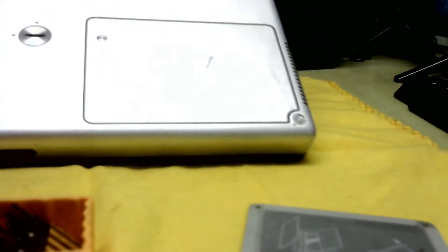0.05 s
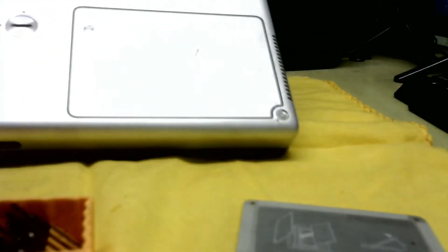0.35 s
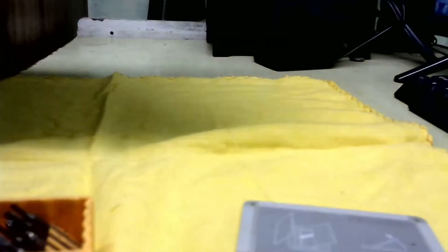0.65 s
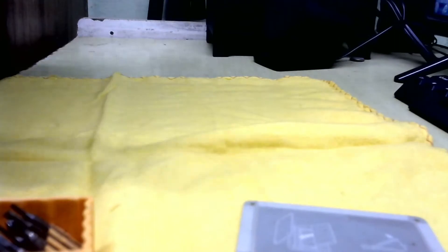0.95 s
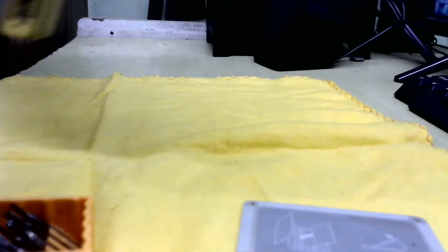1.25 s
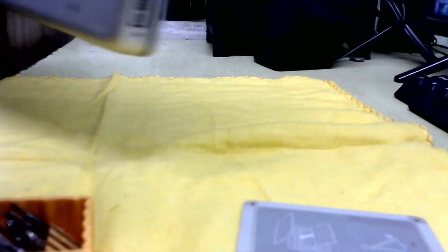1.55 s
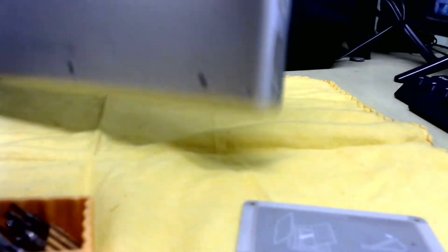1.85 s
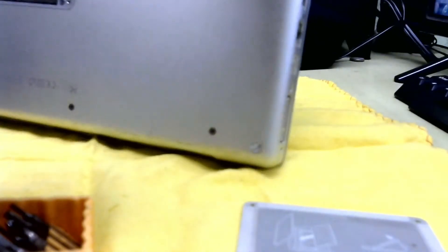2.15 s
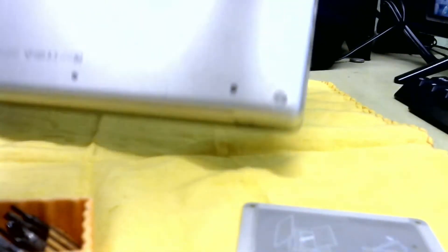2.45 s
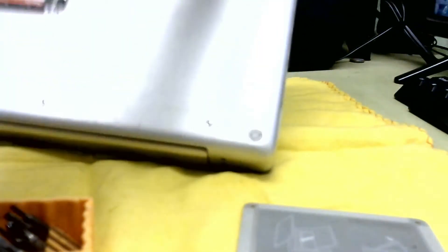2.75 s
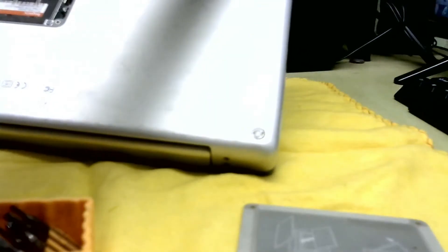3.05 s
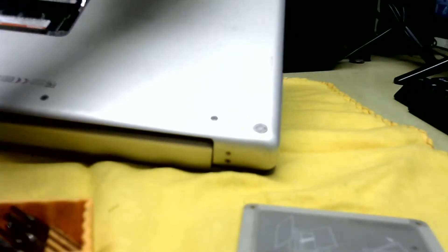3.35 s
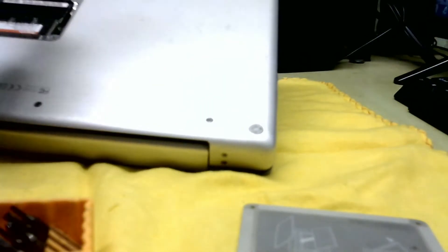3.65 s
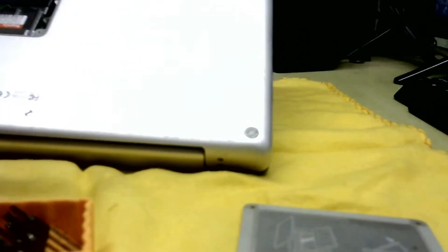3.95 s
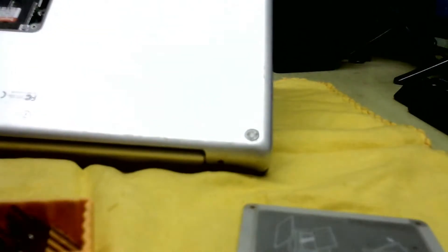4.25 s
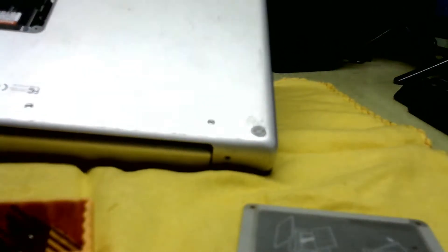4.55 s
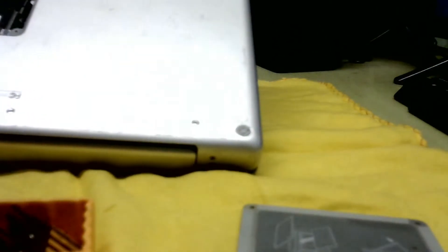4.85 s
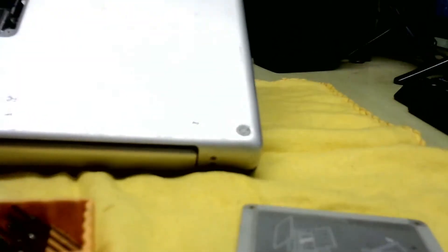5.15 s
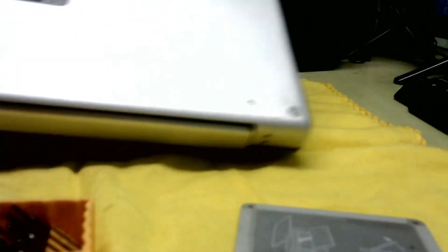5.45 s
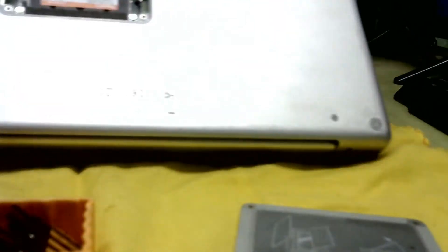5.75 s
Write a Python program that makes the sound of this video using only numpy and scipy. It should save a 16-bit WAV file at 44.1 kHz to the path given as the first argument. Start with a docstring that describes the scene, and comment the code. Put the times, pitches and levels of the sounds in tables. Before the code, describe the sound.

In a small, quiet room with a faint thin whine, hands turn a metal laptop near the microphone. Brief gritty creaks build to a sharp click, followed by light swishes of skin and hollow finger bumps. The laptop lands on a cloth-covered table with two dull knocks and a firmer, clicking thump. Loose parts tick very faintly, and a few gentle clicks, strokes and bumps end the handling.

```python
"""A metal laptop is handled close to a small microphone, in a small, dry room with low noise and a thin whine.
First it is lifted and turned: its shell creaks by stick-slip friction, clicks and squeaks once,
while skin hisses over the metal and fingers bump the hollow case. From two seconds on its edge thumps
a cloth-covered table, exciting their joint modes. Loose parts tick faintly while it stands on edge;
last come softer thumps, clicks and strokes as it is laid down."""
import sys
import numpy as np
from scipy import signal
from scipy.fft import rfft, irfft
from scipy.io import wavfile
from scipy.ndimage import uniform_filter1d

SR = 44100
rng = np.random.default_rng(int(sys.argv[2]) if len(sys.argv) > 2 else 0)


def int16_out(signal):
    """Quantize to a 16-bit WAV file."""
    q = np.round(np.clip(np.atleast_2d(signal).T, -1, 1) * 32767)
    wavfile.write(sys.argv[1], SR, q.astype(np.int16))


N = 264864
T = np.arange(N) / SR
AGE = T[:SR // 2]  # seconds since the onset of one event

# The spectrum of a click. Each row: frequency in Hz, level in dB.
CLICK_SPECTRUM = [(100, -38), (400, -2.5), (750, 15), (3100, -4.5), (4100, -8), (5400, -5.5), (9200, -8),
                  (10800, -18.5), (16000, -25.5)]


def undb(db):
    """Amplitude grows tenfold for every 20 dB."""
    return 10 ** (np.asarray(db) / 20)


def unit(x):
    """Normalisation to an rms of 1."""
    return x / np.sqrt(np.mean(x ** 2))


def crest(x, size):
    """Short-time normalisation: the loudest stretch of size samples gets an rms of 1."""
    return x / np.sqrt(uniform_filter1d(x ** 2, size, mode="constant").max())


def add(track, s, sound):
    """Superposition: a sound adds to the track from s seconds on."""
    start = max(int(s * SR), 0)
    track[start:start + len(sound)] += sound[:max(N - start, 0)]


def through(x, response):
    """A linear system convolves its input with its impulse response; the length is kept."""
    return signal.fftconvolve(x, response)[:len(x)]


def colour(x, points, size=4096):
    """Minimum-phase filtering by a curve of (Hz, dB) points."""
    hz, db = np.transpose(points)
    bins = np.maximum(np.arange(size // 2 + 1) * SR / size, 1)
    gain = undb(np.interp(np.log(bins), np.log(hz), db))
    cepstrum = irfft(np.log(gain))
    cepstrum[1:size // 2] *= 2  # folding the cepstrum makes the filter causal
    cepstrum[size // 2 + 1:] = 0
    return through(x, irfft(np.exp(rfft(cepstrum))))


def band(x, hz, octaves):
    """Band-pass filtering around hz."""
    edges = np.minimum(hz * 2 ** (np.array([-.5, .5]) * octaves), [SR / 3, SR / 2 - 1])
    return signal.sosfilt(signal.butter(2, edges, "band", fs=SR, output="sos"), x)


def fade(t60):
    """Exponential decay, by 60 dB in t60 seconds."""
    return np.exp(-np.log(1000) * AGE / t60)


def ring(modes):
    """Modal superposition: damped sines add, with neighbours in opposite phase."""
    return sum((-1) ** k * undb(db) * fade(t60) * np.sin(2 * np.pi * hz * AGE)
               for k, (hz, db, t60) in enumerate(modes))


def gripped(modes, spread_db, detune):
    """Boundary conditions: each spot and grip shifts the frequencies and weights of the modes."""
    chance = rng.standard_normal((len(modes), 2))
    return [(hz * (1 + detune * a), db + spread_db * b, t60)
            for (hz, db, t60), (a, b) in zip(modes, chance)]


def walk(rate):
    """Random drift: interpolation between normal draws, rate of them a second."""
    knots = rng.standard_normal(1024)
    return np.interp(T * rate, np.arange(len(knots)), knots)


def scattered(start, end, count):
    """Stratified chance: one random moment in each equal share of the span."""
    return start + (end - start) * (np.arange(count) + rng.random(count)) / count


def background(air_db=-59.5, waver_db=1, drift_hz=13, hiss_db=-94, hiss_hz=8000):
    """Ambient noise: a low broadband floor, plus the wavering tones and hiss of running equipment."""
    # The room noise. Each row: frequency in Hz, level in dB.
    air_spectrum = [(25, -47.5), (60, -20), (150, -15), (300, -5.5), (400, -12.5), (750, -16),
                    (1200, -28.5), (2000, -31.5), (4000, -43), (8300, -49.5), (10500, -53), (15500, -56.5)]
    # The whine. Each row: frequency in Hz, level in dB.
    whine_tones = [(1643, -78), (1808, -83)]
    air = unit(colour(rng.standard_normal(N), air_spectrum)) * undb(air_db + waver_db * walk(16))
    whine = 0
    for hz, db in whine_tones:
        phase = 2 * np.pi * np.cumsum(hz + drift_hz * walk(120)) / SR
        whine += undb(db) * unit(np.sin(phase))
    hiss = undb(hiss_db) * unit(band(rng.standard_normal(N), hiss_hz, octaves=.1))
    return air + whine + hiss


def slips(pressure, per_s, scatter_db):
    """Stick-slip friction: impulses at random moments, as strong as the pressure behind them."""
    sizes = rng.choice([-1, 1], len(AGE)) * undb(scatter_db * rng.standard_normal(len(AGE)))
    return pressure * sizes * (rng.random(len(AGE)) < per_s / SR)


def shell(x):
    """Resonance: the metal shell answers x with its modes, a little different in every grip."""
    # The shell's modes. Each row: frequency in Hz, relative level in dB, t60 in seconds.
    shell_modes = [(580, -5, .08), (667, -5, .07), (859, 0, .08), (995, -2, .08), (1085, -1, .06),
                   (1490, 1, .06), (1820, -4, .04), (1950, -3, .04), (2050, -2, .04), (2450, -3, .04),
                   (2770, -3, .04), (2930, -2, .04), (5350, -6, .03)]
    response = ring(gripped(shell_modes, spread_db=2, detune=.05))
    return through(x, response / np.linalg.norm(response))


def creaks(slips_per_s=3800, ring_db=-12, release_s=0.012):
    """Stick-slip between tight parts drives the shell; the firmest slips add a bright grit."""
    # The creaks. Each row: start, length and rise in seconds, body level in dB, body centre in Hz,
    # grit level in dB.
    creak_events = [(0, 0.01, 0.0017, -39.5, 1710, -45), (0.042, 0.027, 0.0034, -55, 1650, -75),
                    (.128, 0.018, 0.0041, -45.5, 1740, -52), (0.18, 0.023, 0.0079, -49, 1944, -50.5),
                    (0.255, 0.034, 0.008, -38.5, 1910, -45.5), (0.306, 0.015, 0.0055, -47, 2113, -50),
                    (.376, 0.016, 0.0069, -34, 1770, -39.5), (.455, 0.022, 0.0076, -48, 1790, -54),
                    (0.617, 0.023, 0.0046, -58.5, 1210, -70.5), (0.655, 0.095, 0.0084, -69, 2660, -68.5),
                    (0.719, .036, .028, -40.5, 4500, -46), (0.754, .012, .005, -35, 1760, -57),
                    (.788, 0.015, .004, -38.5, 1500, -66), (.81, 0.064, .004, -53.5, 990, -78),
                    (0.843, .032, 0.025, -35.5, 2310, -73), (2.027, 0.023, 0.0064, -56.5, 2010, -79.5),
                    (2.265, .018, .004, -59, 950, -68), (2.804, 0.024, 0.0043, -44.5, 1670, -69),
                    (4.667, 0.011, .004, -54, 1920, -60), (4.962, 0.023, 0.0038, -58, 1394, -65.5),
                    (5.18, 0.015, .004, -67, 1000, -70)]
    # The spectra of a creak's body and grit. Each row: frequency in Hz, level in dB.
    body_spectrum = [(200, -33), (700, -11.5), (1050, 4), (1500, -3), (2900, -1), (3700, -8), (5000, -9),
                     (9000, -25), (16000, -47)]
    grit_spectrum = [(500, -28), (2500, -11), (4500, -13), (6700, -15.5), (8300, 1), (9400, -1),
                     (10700, -17.5), (13500, -24.5), (16000, -39)]
    out = np.zeros(N)
    for s, length, rise_s, body_db, hz, grit_db in creak_events:
        pressure = np.clip(AGE / rise_s, 0, 1) * np.exp(-np.maximum(AGE - length, 0) / release_s)
        run = slips(pressure, slips_per_s, scatter_db=2)
        shaken = run + undb(ring_db) * shell(run)
        body = band(colour(shaken, body_spectrum), hz, octaves=1.1)
        grit = colour(run * pressure ** .7, grit_spectrum)
        span = int(length * SR) + 1
        add(out, s, undb(body_db) * crest(body, span) + undb(grit_db) * crest(grit, span))
    return out


def sliding_skin(attack_s=.03, release_s=0.0091, grain_db=0.3, focus_octaves=.41, low_hz=4700):
    """Friction noise: dry skin hisses on the fine metal finish, each stroke in its own band."""
    # The strokes. Each row: start and length in seconds, level in dB, hiss centre in Hz,
    # swell over the stroke in dB.
    strokes = [(0, .21, -57, 6500, 5), (.78, .21, -56, 8900, -1.5), (.98, 0.21, -56, 7600, -7.5),
               (1.265, .058, -62.5, 8600, -4.5), (1.358, .22, -80.5, 7000, -2.5),
               (1.72, .068, -70.5, 7000, 16), (1.874, 0.057, -73, 5900, 5), (2.058, 0.059, -68, 7000, -5),
               (2.196, 0.056, -52.5, 7780, 11), (2.268, 0.097, -60.5, 7200, -7),
               (2.793, 0.0668, -61, 7000, 1), (3.625, 0.026, -73, 5300, -0.5),
               (4.468, 0.13, -65.5, 7150, -1), (4.583, 0.075, -71.5, 8800, 9),
               (4.667, 0.079, -62.5, 7000, -16), (4.777, 0.049, -58, 8700, 12),
               (5.22, .14, -83.5, 7000, -4), (5.665, 0.044, -66, 6500, 2.5),
               (5.855, 0.091, -72.5, 7000, -5.5)]
    # The spectrum of skin on metal. Each row: frequency in Hz, level in dB.
    skin_spectrum = [(500, -40), (2500, -19), (3700, 3.5), (4800, -6.5), (6500, -9), (8000, -7.5),
                     (9400, -11.5), (10700, -16), (13500, -21), (16000, -27)]
    envelope = np.zeros(N)
    for s, length, db, _, swell_db in strokes:
        attack = np.sin(np.pi / 2 * np.clip((T - s) / attack_s, 0, 1)) ** 2
        hold = undb(db + swell_db * (np.clip((T - s) / length, 0, 1) - .5))
        release = np.exp(-np.clip(T - s - length, 0, 1) / release_s)
        envelope += attack * hold * release
    midpoints = [(s + length / 2, hz) for s, length, _, hz, _ in strokes]
    centre_hz = np.interp(T, *np.transpose(midpoints))
    friction = np.zeros(N)
    for hz in np.geomspace(2000, 14000, 9):
        weight = 1 / np.sqrt(1 + (np.log2(hz / centre_hz) / focus_octaves) ** 4)
        friction += weight * band(rng.standard_normal(N), hz, octaves=1 / 3)
    high_pass = signal.butter(8, low_hz, "high", fs=SR, output="sos")
    hiss = signal.sosfilt(high_pass, colour(friction, skin_spectrum))
    return envelope * undb(grain_db * walk(160)) * unit(hiss)


def crack(hz, octaves, t60, rattle_db, rattle_t60, ring_db):
    """Transient excitation: a fast-dying burst and a faint rattle set the shell ringing."""
    burst = rng.standard_normal(len(AGE)) * (fade(t60) + undb(rattle_db) * fade(rattle_t60))
    shaken = burst + undb(ring_db) * shell(burst)
    return crest(band(colour(shaken, CLICK_SPECTRUM), hz, octaves), size=176)


def tick(hz):
    """A brief contact has a broad spectrum: the bright part of a click."""
    return crack(hz, octaves=1.4, t60=.008, rattle_db=-24, rattle_t60=.1, ring_db=-19.5)


def clicks(scuff_db=-12, scuff_lead_s=.004, scuff_s=.007):
    """Impacts of seams and loose parts: a scuff of slips, a tick, and the hand-damped shell's rattle."""
    # The clicks. Each row: start in seconds, tick level in dB, tick centre in Hz, body level in dB,
    # body centre in Hz, body width in octaves.
    click_events = [(.066, -52.5, 8550, -59, 1700, 1.5), (0.196, -58, 9100, -56, 1900, 2.8),
                    (.3222, -63, 9400, -43, 2000, 0.94), (0.4366, -52.5, 8950, -44.5, 1810, 0.46),
                    (.7602, -36.5, 3500, -29, 720, 0.77), (0.7808, -23, 5200, -26, 900, 0.72),
                    (.8535, -43, 5030, -40.5, 2490, 2.8), (2.037, -66, 4500, -49, 1700, 2.6),
                    (2.057, -68, 7000, -53, 3100, 0.7), (2.26, -44, 8000, -31.5, 2684, 0.38),
                    (2.262, -51, 3000, -31, 1550, 1.12), (2.698, -59, 7410, -67, 3480, 1.7),
                    (2.7917, -38, 6900, -31, 1500, 3.6), (2.799, -35.5, 3400, -34, 2450, 1.1),
                    (2.804, -37.5, 5580, -21, 794, 0.94), (3.3414, -59.5, 4630, -53.5, 1300, 2.65),
                    (3.9041, -60, 6500, -63, 3180, 1), (4.6627, -43, 5550, -45, 790, 0.56),
                    (4.9716, -46.5, 5800, -47, 980, 0.53), (5.179, -59.5, 5740, -51.5, 960, 1.4),
                    (5.543, -70.5, 7000, -72, 1510, 2.1)]
    out = np.zeros(N)
    for s, tick_db, tick_hz, body_db, body_hz, octaves in click_events:
        body = crack(body_hz, octaves, t60=.02, rattle_db=-26, rattle_t60=.06, ring_db=-26)
        add(out, s, undb(tick_db) * tick(tick_hz) + undb(body_db) * body)
        run = slips(AGE * np.exp(-AGE / scuff_s), per_s=3400, scatter_db=3.5)
        scuff = band(colour(run, CLICK_SPECTRUM), tick_hz, octaves=1.6)
        add(out, s - scuff_lead_s, undb(tick_db + scuff_db) * crest(scuff, size=176))
    return out


def bump(upper_db, swell_s, detune, lower_hz=294.4, upper_hz=571.7, t60=.11, scuff_db=-13):
    """Soft excitation: a finger pad swells the hollow case's two lowest modes, with a dull scuff."""
    modes = gripped([(lower_hz, 0, t60), (upper_hz, upper_db, t60)], spread_db=.5, detune=detune)
    scuff = undb(scuff_db) * unit(band(rng.standard_normal(len(AGE)), 240, octaves=0.65)) * fade(t60)
    swell = 1 - np.exp(-(AGE / swell_s) ** 2)
    return crest((ring(modes) + scuff) * swell, size=880)


def finger_bumps(light_db=-59, light_spread_db=3.0, light_count=9):
    """The point of contact sets the response: firm bumps, and light touches on other spots."""
    # The firm bumps. Each row: start in seconds, level in dB, swell in seconds,
    # relative level of the upper mode in dB.
    firm_bumps = [(.18, -51, 0.012, -28), (.323, -54, 0.0076, -13), (0.407, -47.5, .016, -15.5),
                  (1.55, -55.5, 0.016, 7), (1.822, -52.5, .005, -9.5), (1.967, -52, .006, -16),
                  (2.395, -52.5, 0.007, 4.5), (3.229, -52, .008, -20), (3.364, -46.5, .02, 1),
                  (3.842, -53.5, 0.012, -11), (4.021, -51.5, 0.0085, -16), (4.299, -52.5, .015, -12.5),
                  (4.548, -47, 0.022, -27.5), (4.86, -50, .015, -12), (5.348, -47.5, .01, -11.5),
                  (5.379, -55.5, 0.0063, 7), (5.595, -48, 0.01, -27)]
    out = np.zeros(N)
    for s, db, swell_s, upper_db in firm_bumps:
        add(out, s, undb(db) * bump(upper_db, swell_s, detune=0.022))
    for s, size in zip(scattered(0, N / SR, light_count), rng.standard_normal(light_count)):
        touch = bump(upper_db=-9, swell_s=.014, detune=.1)
        add(out, s, undb(light_db + light_spread_db * size) * touch)
    return out


def squeak(start_s=.7595, length_s=.0152, hz=785, db=-28, wobble=0.15, overtone_db=-15):
    """Periodic stick-slip: for a moment the slipping locks into a wobbling pitch."""
    phase = 2 * np.pi * np.cumsum(hz * (1 + wobble * walk(400))) / SR
    envelope = np.interp((T - start_s) / length_s, [0, .1, .85, 1], [0, 1, 1, 0])
    return undb(db) * envelope * unit(np.sin(phase) + undb(overtone_db) * np.sin(2 * phase))


def blow(corner_hz, dense_db=-31, dense_t60=0.19, rumble_db=-36, rumble_t60=.3):
    """Contact time limits bandwidth: cloth spreads the push, and firmer blows reach higher modes."""
    # The joint modes of table and laptop. Each row: frequency in Hz, relative level in dB,
    # t60 in seconds.
    table_modes = [(66, -32.5, 0.2), (113, -18, 0.34), (134.9, -14, 0.35), (153.9, 3, .16),
                   (226.6, -6, .19), (284, -7.5, 0.12), (356.5, -3, 0.1), (463, -11.5, 0.079),
                   (541, -8.5, 0.079), (656, -17, 0.034), (770, -15, 0.038)]
    push = AGE ** 2 * np.exp(-2 * np.pi * corner_hz * AGE)
    dense_modes = unit(band(rng.standard_normal(len(AGE)), 280, octaves=2.8)) * fade(dense_t60)
    rumble = unit(band(rng.standard_normal(len(AGE)), 70, octaves=0.76)) * fade(rumble_t60)
    modes = ring(gripped(table_modes, spread_db=3, detune=0.02))
    flex = through(push, modes + undb(dense_db) * dense_modes + undb(rumble_db) * rumble)
    return crest(np.gradient(flex), size=660)  # the air follows the velocity of the surface


def edge_thumps(firming=3.02, settle_db=-5):
    """Cloth stiffens under compression: the edge lands softly, seats more firmly, then settles."""
    # The landings. Each row: start in seconds, level in dB, corner of the push in Hz, seating delay
    # in seconds, relative seating level in dB, settling delay in seconds.
    landings = [(2.028, -31.5, 85, .0295, -6, .068), (2.246, -27.5, 190, 0.01084, 4.5, .0396),
                (2.7843, -16, 168, .0132, 1.5, .0301), (2.869, -41.5, 70.4, .033, -3, .052),
                (2.9985, -47.5, 91.3, .02, -11.5, .04), (3.341, -49, 159.4, .02, -22, .04),
                (4.665, -54, 203, .02, -26, .04), (4.783, -55, 141, .015, -33, .04),
                (4.976, -42, 99.7, .026, -30, .04), (5.709, -51, 100, .02, -16, .04),
                (5.867, -41, 80, .02, -22.5, .04)]
    out = np.zeros(N)
    for s, db, hz, seat_s, seat_db, settle_s in landings:
        add(out, s, undb(db) * blow(hz))
        add(out, s + seat_s, undb(db + seat_db) * blow(hz * firming))
        add(out, s + settle_s, undb(db + seat_db + settle_db) * blow(hz * firming))
    return out


def loose_parts(from_s=3.0, to_s=4.1, db=-75, spread_db=2, hz=6000, count=5):
    """Small random impacts: parts tick inside the laptop while it stands on its edge."""
    out = np.zeros(N)
    for s, size in zip(scattered(from_s, to_s, count), rng.standard_normal(count)):
        add(out, s, undb(db + spread_db * size) * tick(hz))
    return out


def room(x, wet_db=-10, t60=0.093, build_s=0.0011):
    """Reverberation: near surfaces return a short, dense tail with little bass."""
    build_up = np.clip(AGE / build_s, 0, 1) ** 2
    tail = band(rng.standard_normal(len(AGE)), 2200, octaves=4.74) * fade(t60) * build_up
    return x + undb(wet_db) * through(x, tail / np.linalg.norm(tail))


def scene():
    """Superposition: all the handling sounds in the room, over the background."""
    shell_sounds = creaks() + squeak() + clicks() + loose_parts()
    handling = shell_sounds + edge_thumps() + finger_bumps() + sliding_skin()
    return (room(handling) + background())[None]


def record(dry, low_hz=55, top_hz=15900):
    """Band limiting: the small microphone loses the deep bass, and the top is cut."""
    thin = signal.sosfilt(signal.butter(2, low_hz, "high", fs=SR, output="sos"), dry)
    return signal.sosfilt(signal.ellip(8, .2, 70, top_hz, fs=SR, output="sos"), thin)


dry = scene()
out = record(dry)
int16_out(out)
```